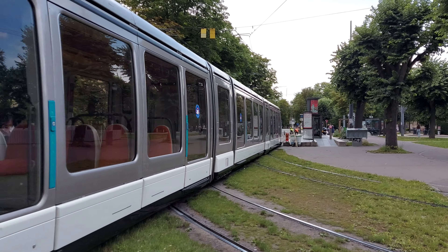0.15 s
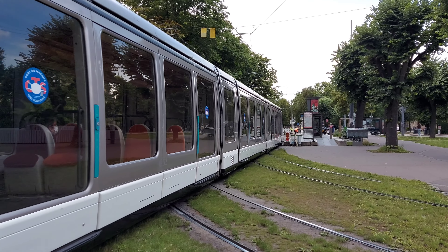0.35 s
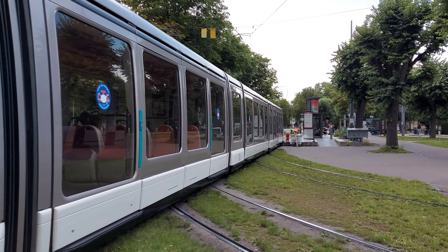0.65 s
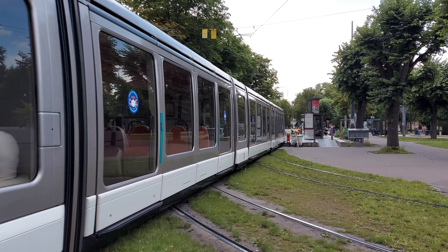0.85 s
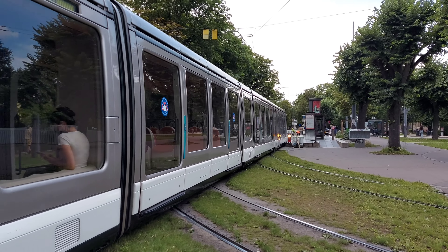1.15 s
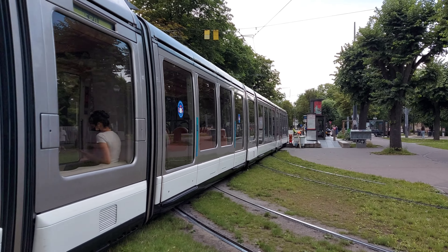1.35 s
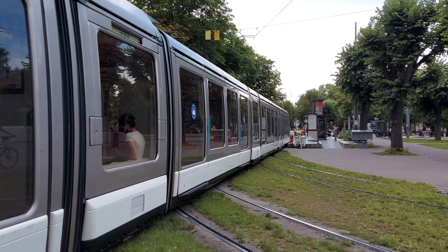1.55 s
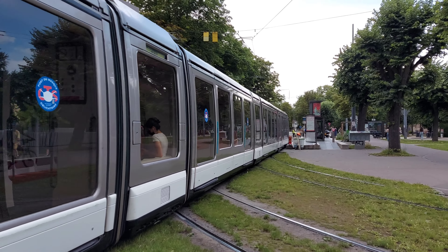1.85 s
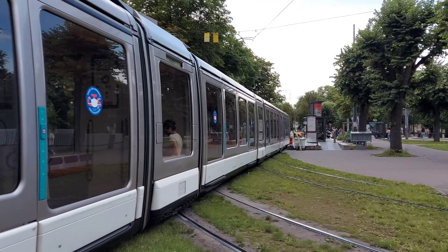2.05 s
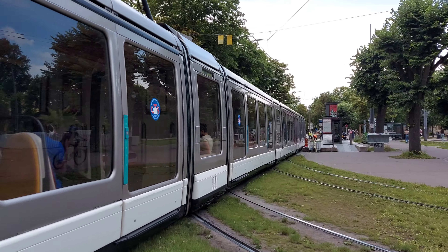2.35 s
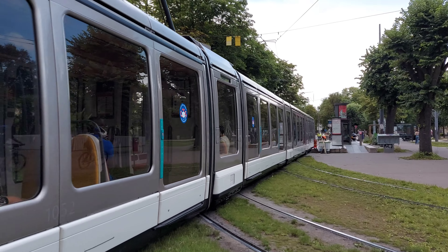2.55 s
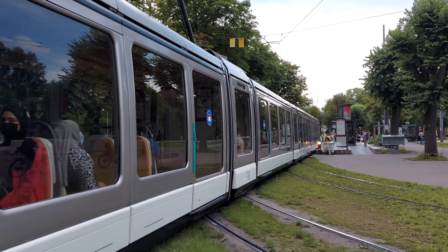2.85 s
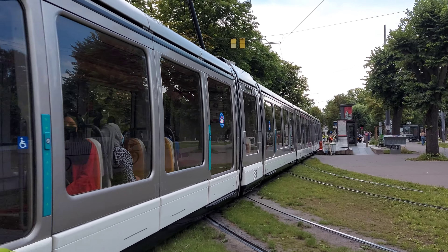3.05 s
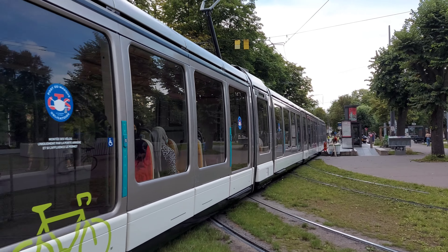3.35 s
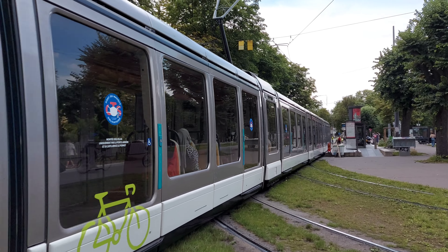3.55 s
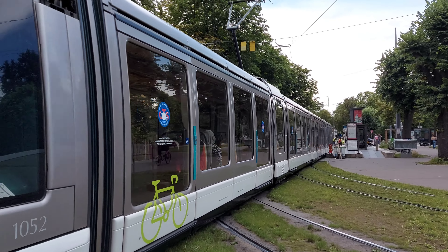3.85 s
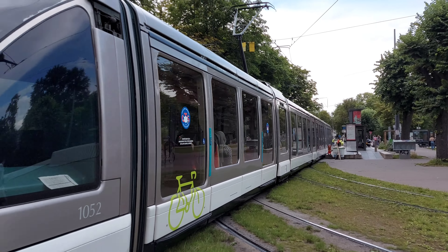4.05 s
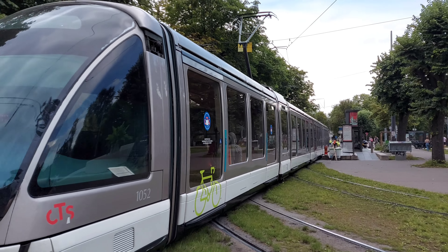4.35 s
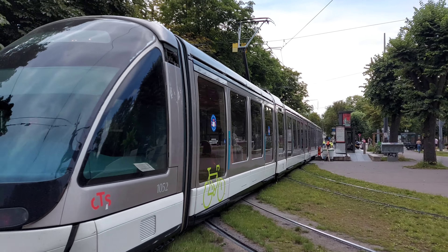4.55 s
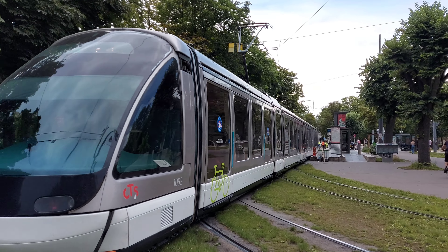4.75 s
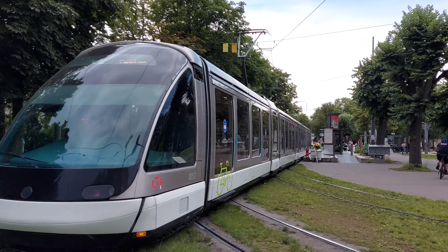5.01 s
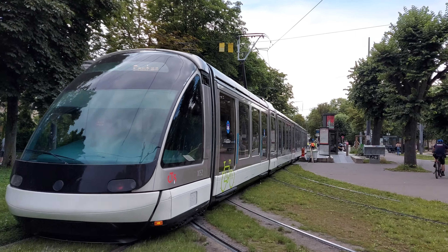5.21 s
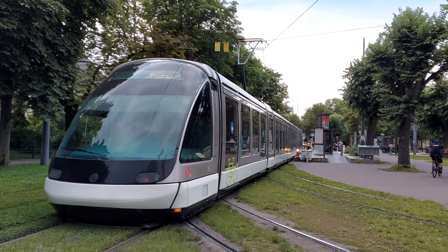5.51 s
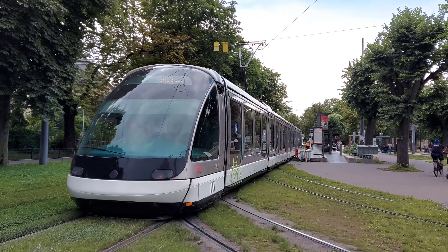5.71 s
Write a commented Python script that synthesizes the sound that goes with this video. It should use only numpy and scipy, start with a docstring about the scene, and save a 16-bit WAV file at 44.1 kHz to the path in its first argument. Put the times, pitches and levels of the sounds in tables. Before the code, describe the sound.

A tram passes slowly and close by outdoors, heard on a small stereo microphone with a dry, wide image. From 0 to 1 s a deep rumble and growl carry gritty flange scraping, a tight cluster of clattering rattles at 0.1-0.4 s, bass thuds and shrill steely ringing. From about 1.1 to 2 s the rolling softens and a thin, slightly sinking motor whine near 900 Hz shows faintly, with a heavier thud and knock at 1.7 s. At 2.2 s the growl jumps back; between 2.4 and 3.3 s comes the densest, brightest passage of rattles, pings, scraping and thuds, with a low boom swelling after 3.2 s. From 3.9 s it thins, with sparse clacks and short whines around 4.5 and 5.1 s. A thud at 4.9 s and another at 5.3 s lead into a last clatter, sharpest at 5.5 s, ringing on to the end. Faint leaf and traffic hiss lies behind.

```python
"""Slow tram over a track crossing

A low-floor tram rolls slowly past over a track crossing on grass-bedded rails, heard by a small two-port microphone.
Coloured noise makes the rumbling track bed, growling bogies, roaring rail and scraping flanges; decaying sines
make the thuds. Flange rattles drive resonators that ring like steel wheels, brief pings mix sine and hiss,
and gliding sines whine faintly as motors go by."""
import sys
import numpy as np
from scipy import signal
from scipy.fft import rfft, irfft, next_fast_len
from scipy.io import wavfile

SR = 44100
rng = np.random.default_rng(int(sys.argv[2]) if len(sys.argv) > 2 else 0)


def inscribe(sig):
    """Save sig as 16-bit PCM at rate SR to the path in sys.argv[1].

    A 1-D sig is mono; a 2-D sig holds one channel per row.
    Samples are clipped to [-1, 1] before scaling.
    """
    pcm = np.round(np.clip(np.atleast_2d(sig).T, -1, 1) * 32767)
    wavfile.write(sys.argv[1], SR, pcm.astype(np.int16))


N = 259175
FFT_SIZE = next_fast_len(N, True)

# Colour of the track bed. Each row: frequency in Hz, density in dB per Hz.
BED_COLOUR = [(15, -49), (25, -20), (63, -5), (81, 0), (96, 4), (130, -19), (160, -14), (210, -28),
              (350, -120)]
# Colour of flange scraping, borrowed for the far street. Each row: frequency in Hz, density in dB per Hz.
FLANGE_COLOUR = [(1000, 6), (1300, 4), (2000, -2.5), (3000, -2.5), (4000, 0), (4700, -2.5), (6500, -7),
                 (8600, -3.5), (9300, -6), (13000, -9), (14300, -12.5), (16200, -24)]
# Edges between the four parts of the contact spectrum, in Hz.
PART_EDGES_HZ = [3200, 4800, 7000]


def from_db(db):
    """Decibels to gain."""
    return 10 ** (np.asarray(db) / 20)


def rms_one(x):
    """Scale to unit rms."""
    return x / np.sqrt(np.mean(x ** 2) + 1e-20)


def in_time(rows):
    """Columns of a curve table, interpolated at every sample."""
    s, *columns = np.transpose(rows)
    return [np.interp(np.arange(N) / SR, s, column) for column in columns]


def at_hz(points, hz):
    """A spectrum table read on a log-frequency axis."""
    table_hz, values = np.transpose(points)
    return np.interp(np.log(hz), np.log(table_hz), values)


def bins_hz():
    """Frequencies of the transform bins, at least 1 Hz so that their logarithm exists."""
    return np.maximum(np.arange(FFT_SIZE // 2 + 1) * SR / FFT_SIZE, 1)


def to_time(bins):
    """Transform bins back to samples."""
    return irfft(bins, FFT_SIZE)[..., :N]


def drift(rate_hz):
    """Slow random wander of unit rms: low-passed noise made at every 40th sample, then interpolated."""
    step, settle = 40, 2000
    pole = np.exp(-2 * np.pi * rate_hz * step / SR)
    raw = rng.standard_normal(N // step + settle + 2)
    slow = signal.lfilter([1], [1, -2 * pole, pole * pole], raw)[settle:]
    return np.interp(np.arange(N) / step, np.arange(len(slow)), rms_one(slow))


def noise(spectrum):
    """Two unrelated noises (mid, side) of one colour, silent outside the table; joint rms 1."""
    hz = bins_hz()
    inside = (hz > spectrum[0][0]) & (hz < spectrum[-1][0])
    white = rfft(rng.standard_normal((2, FFT_SIZE)))
    return rms_one(to_time(white * from_db(at_hz(spectrum, hz)) * inside))


def resonance(x, hz, width_hz):
    """One mode as a two-pole filter with gain close to 1 at its peak."""
    r = np.exp(-np.pi * width_hz / SR)
    feed = np.array([1, 0, -1]) * (1 - r * r) / 2
    return signal.lfilter(feed, [1, -2 * r * np.cos(2 * np.pi * hz / SR), r * r], x)


def double_resonance(x, hz, width_hz):
    """The same mode twice in a row, for steeper skirts and a softer onset."""
    return resonance(resonance(x, hz, width_hz), hz, width_hz)


def spell(start_s, end_s, db, rise_db_per_s, fall_db_per_s):
    """Level in dB that rises to a plateau and falls away after it."""
    t = np.arange(N) / SR
    return db - rise_db_per_s * np.maximum(start_s - t, 0) - fall_db_per_s * np.maximum(t - end_s, 0)


def loudest_spell(rows, rise_db_per_s, fall_db_per_s):
    """The highest of several spells at every moment, in dB."""
    return np.max([spell(*row, rise_db_per_s, fall_db_per_s) for row in rows], axis=0)


def track_bed(bed_db):
    """Rolling weight shakes the ground under the rails: a deep noise rumble that follows its level curve."""
    return from_db(bed_db) * noise(BED_COLOUR)


def low_boom():
    """Bed noise through two sharp resonances becomes a narrow boom near 55 Hz that swells."""
    # Swells of the boom. Each row: start in seconds, end in seconds, level in dB.
    boom_swells = [(.5, .95, -36), (1.15, 1.8, -40), (3.2, 3.95, -30.5)]
    floor_db, edge_db_per_s = -38.5, 57
    boom_db = np.maximum(loudest_spell(boom_swells, edge_db_per_s, edge_db_per_s), floor_db)
    narrow = resonance(resonance(noise(BED_COLOUR), 52.46, 3.1), 55.36, 0.9)
    return from_db(boom_db) * rms_one(narrow)


def bogie_frame(load_db, bumps):
    """Rough rolling shakes the bogie frame: a growl whose modes surge by turns."""
    # Colour of the growl. Each row: frequency in Hz, density in dB per Hz.
    frame_colour = [(71, -23), (120, 2.5), (145, 1.5), (189, -2.5), (220, -2), (292, 0.5), (466, -14),
                    (589, -48), (650, -21), (840, -59), (1430, -120)]
    # Modes of the frame. Each row: frequency in Hz, width of each of two passes in Hz, relative level in dB.
    frame_modes = [(186.7, 24, -3), (286.2, 49, -3.5), (360.6, 80, -6.5), (451, 29, -10.5)]
    modes_db, surge_db, surge_rate_hz = -13.0, 3, 9
    shaken = noise(frame_colour)
    growl = shaken
    for hz, width_hz, db in frame_modes:
        gain = from_db(db + modes_db + surge_db * drift(surge_rate_hz))
        growl = growl + gain * rms_one(double_resonance(shaken, hz, width_hz))
    return from_db(load_db + 1.17 * bumps) * rms_one(growl)


def rail_roar(contact, bumps):
    """Rough rail under rolling wheels roars; it also takes up the low part of grinding and rattles."""
    # Colour of the rail. Each row: frequency in Hz, density in dB per Hz.
    rail_colour = [(290, 7.5), (500, -1), (595, -7), (764, 0), (909, 0), (1200, -9), (1290, -18.5),
                   (1900, -13), (2470, -20.5), (4180, -120)]
    # Roar from rolling. Each row: time in seconds, level in dB.
    roar_curve = [(0.0, -47), (0.16, -31.5), (1.49, -40), (3.2, -29.5), (4.92, -40), (5.87, -34)]
    rattle_db = 2.5
    rolling = from_db(in_time(roar_curve)[0] + 1.5 * bumps + 1.5 * drift(45))
    rattled = from_db(rattle_db) * contact[0]
    return np.hypot(rolling, rattled) * noise(rail_colour)


def running_gear(load_db, bed_db, contact):
    """Bed, boom, bogie frame and rail together; the same bumps move frame and rail."""
    bumps = drift(14)
    return track_bed(bed_db) + low_boom() + bogie_frame(load_db, bumps) + rail_roar(contact, bumps)


def flange_contact(grind_db):
    """Contact strength in four parts of the spectrum: steady grinding plus rattles that start sharply and die away."""
    # Grinding turns shrill near 4 kHz. Each row: start in seconds, end in seconds, extra level in dB.
    squeals = [(0, .5, 0), (2.4, 3.153, -2)]
    # Rattles as flanges strike the crossing. Each row: start in seconds, level in dB before a common trim,
    # brightness in dB (tilts lowest part against highest), clang near 4 kHz in dB before a common lift,
    # 60 dB decay in seconds.
    rattles = [(0.025, -33.5, -16.5, 10, 0.92), (0.108, -17, -1.5, -3.5, 0.71), (0.145, -18, 2, 1, .3),
               (0.1774, -23.5, -9, 0, 0.23), (0.3214, -31.5, 11, -13, 0.74), (0.35, -11.5, -3, 2, 0.084),
               (0.366, -20, -5, -2, 0.4), (0.3904, -17.5, -1, 0, 0.28), (0.772, -19.5, -1, -3.5, 0.54),
               (0.8144, -34, 13, 6, 0.2), (0.991, -18.5, 2, -10, 0.18), (1.089, -22.5, 1.5, -14, 0.81),
               (1.202, -16.5, 7, -10, 0.046), (1.4292, -22, -1, -33, 0.17), (1.6332, -23, 2, -9, 0.059),
               (1.721, -22, -2.5, -3.5, 0.75), (1.7733, -15.5, 0.5, 0.5, 0.16), (1.874, -25, -2, -3, 0.1),
               (2.0715, -20.5, -1, -5.5, 0.57), (2.2243, -24.5, -4, 1, 0.28), (2.309, -20, 2, 2, 0.22),
               (2.3484, -30, 6, 12, 0.13), (2.417, -14.5, 2.5, 3, 0.19), (2.516, -15, 1, 2, 0.11),
               (2.617, -26.5, -8, 7.5, 0.12), (2.658, -21.5, 2.5, -2, 1), (2.6955, -17, 3.5, 6, 0.096),
               (2.7414, -17.5, 0, -7, 0.93), (2.77, -11, 0, -2.5, 0.28), (2.838, -16.5, 3, 13, 0.029),
               (2.87, -8.5, 2.5, -3, 0.074), (2.9307, -21, 2, -14, 0.37), (3.069, -32, -17, 3, 0.064),
               (3.165, -20, 1, -19, 0.66), (3.2246, -10, -0.5, -12, 0.28), (3.304, -21.5, 7, -0.5, 0.45),
               (3.4416, -23, -1, -0.5, 0.18), (3.488, -17.5, 1.5, -9, 0.61), (3.6844, -20, 5.5, -6, 0.18),
               (3.8874, -19, 2, -9, 0.6), (4.1185, -21, -2.5, -10, 0.3), (4.5694, -27.5, -0.5, -11, 0.76),
               (4.89, -22.5, -1, -9, 0.11), (4.95, -27, -4, -12, 0.72), (5.203, -28.5, -2, -4, 0.21),
               (5.262, -22, -0.8, -13, 1), (5.347, -19, 2.5, -7.5, 0.9), (5.375, -35, -2, -8, .3),
               (5.431, -25, -5, -18, 0.18), (5.525, -11, -2.5, -9, 0.11), (5.6286, -22.5, -5, 1.5, 0.12),
               (5.738, -22.5, -1.5, -14, 0.49), (5.768, -23, 3, -2, 0.42)]
    attack_s, low_lag_s = 0.0022, 0.0024
    rattle_trim_db, clang_lift_db, least_shrill_db = -16.0, 5.5, -3.4
    squeal_edge_db_per_s = 10
    power = np.tile(from_db(grind_db + 1.4 * drift(16)) ** 2, (4, 1))
    shrill_db = loudest_spell(squeals, squeal_edge_db_per_s, squeal_edge_db_per_s)
    power[1] *= from_db(np.maximum(shrill_db, least_shrill_db)) ** 2
    for s, db, bright_db, clang_db, t60_s in rattles:
        at = round(s * SR)
        t = np.arange(min(N - at, SR // 2)) / SR
        shape = from_db(db + rattle_trim_db - 60 * t / t60_s) * (1 - np.exp(-t / attack_s))
        part_gains = from_db([[-bright_db], [clang_db + clang_lift_db], [0], [bright_db]])
        power[:, at:at + len(t)] += (shape * part_gains) ** 2
    # the lowest part builds up later
    lag = np.exp(-1 / (low_lag_s * SR))
    power[0] = signal.lfilter([1 - lag], [1, -lag], power[0], zi=[lag * power[0, 0]])[0]
    return np.sqrt(power)


def flanges(contact):
    """Gritty broadband scrape, split into four parts so that each rattle has its own colour."""
    grit = drift(32)      # grains of rust and sand
    scrape, hz = rfft(noise(FLANGE_COLOUR), FFT_SIZE), bins_hz()
    below = [0] + [1 / (1 + (hz / edge) ** 8) for edge in PART_EDGES_HZ] + [1]
    out = 0
    for strength, down, up in zip(contact, below, below[1:]):
        part = to_time(scrape * (up - down))
        out = out + strength * from_db(1.8 * grit + 1.6 * drift(35)) * part
    return out


def street():
    """Far traffic and leaves: a faint steady noise with the flange colour."""
    return from_db(-53.5) * noise(FLANGE_COLOUR)


def wheels(contact):
    """The flange contact drives the modes of three sets of wheels; each mode takes up force by turns, its
    flicker the same in both ports."""
    # Modes of three sets of wheels, A, B and C; C rings briefly between the others and again at the end.
    # Each row: frequency in Hz, width in Hz before widening, relative level in dB.
    modes_a = [(1650, 140, 0), (1880, 130, 2), (2545, 120, 0), (3270, 80, -10), (4070, 100, -3),
               (4450, 120, -4), (5580, 120, -6), (6400, 110, -7), (7880, 80, 1), (8740, 90, -1),
               (9980, 160, -7), (11900, 130, -11), (13450, 180, -8)]
    modes_b = [(1200, 110, 3), (1620, 160, 3), (2160, 140, -5), (3040, 130, -9), (3980, 150, -3),
               (4210, 130, 2), (5960, 80, -6), (6500, 110, -4), (8255, 130, 1), (10210, 90, 1),
               (12100, 90, -9), (13670, 100, -3), (15550, 70, -13)]
    modes_c = [(2560, 110, -2), (4230, 90, -6), (5740, 80, -7), (6500, 90, -3), (8230, 120, 0),
               (10210, 90, -2), (13650, 90, -4)]
    # When sets A, B and C ring, one list each.
    # Each row: start in seconds, end in seconds, relative level in dB.
    wheel_spells = [
        [(0, 1.18, 7)],
        [(2.2, 3.86, 4)],
        [(1.72, 1.9, 5), (4.9, 5.88, 6.5)],
    ]
    rise_db_per_s, fall_db_per_s = 20.5, 15
    ring_db, flicker_db, widen = 6.0, 2.5, 1.45
    likeness = 0.95      # a near source: ports partly alike
    shared, own = rng.standard_normal((2, N))
    pair = np.array([shared, likeness * shared + np.sqrt(1 - likeness ** 2) * own])
    out = 0
    for modes, near in zip((modes_a, modes_b, modes_c), wheel_spells):
        near_db = loudest_spell(near, rise_db_per_s, fall_db_per_s)
        for hz, width_hz, db in modes:
            strength = contact[np.searchsorted(PART_EDGES_HZ, hz)]
            force = strength * from_db(near_db + flicker_db * drift(17.0))
            out = out + from_db(db + ring_db) * double_resonance(pair * force, hz, width_hz * widen)
    return out


def pings():
    """Brief rough tones: a sine wavering in pitch and a narrow hiss swell, flutter, hold and ring out."""
    # Brief pings near wheel pitches, and a few lower knocks.
    # Each row: start in seconds, pitch in Hz, nominal peak in dB, hold in seconds.
    ping_rows = [(0.027, 2660, -29, 0.0079), (0.035, 4130, -38.5, 0.014), (.19, 4430, -31, 0.01),
                 (0.385, 2520, -26, 0.011), (0.425, 4060, -32, 0.023), (0.454, 2530, -42, 0.028),
                 (0.677, 8900, -43, .012), (0.798, 2570, -32, 0.011), (0.028, 1410, -32, 0.015),
                 (1.712, 680, -35, .025), (1.768, 916, -28, 0.016), (2.623, 4100, -39, 0.0087),
                 (2.674, 4220, -34.5, 0.037), (2.76, 4130, -43.5, .36), (2.93, 3960, -45, 0.156),
                 (2.837, 4210, -30, 0.0053), (2.892, 4200, -50, 0.027), (3.069, 4070, -31, 0.0065),
                 (3.215, 4200, -37, 0.013), (3.165, 1600, -31, 0.035), (5.372, 4250, -38, 0.0089),
                 (5.429, 5690, -32.5, 0.007), (5.43, 13800, -40, .016), (5.435, 10200, -38, 0.013),
                 (5.44, 8230, -52, 0.013), (5.522, 2600, -37, 0.011), (5.792, 6500, -40, 0.018)]
    rise_s, t60_s, flutter_db = 0.0018, 0.044, 3.0
    waver_share, hiss_width_share = .007, .035      # shares of the pitch
    hiss_gain = .65
    out, t = np.zeros(N + SR), np.arange(SR * 3 // 4) / SR
    waver_s = np.pad(np.cumsum(waver_share * drift(65.5)) / SR, (0, SR), "edge")
    for s, hz, db, held_s in ping_rows:
        at = slice(round(s * SR), round(s * SR) + len(t))
        shape = (1 - np.exp(-t / rise_s)) * from_db(db - 60 * np.maximum(t - held_s, 0) / t60_s)
        width_hz = hiss_width_share * hz
        rough = resonance(rng.standard_normal(len(t)), hz, width_hz)
        hiss = rms_one(resonance(rough, hz, 2 * width_hz)) / np.sqrt(2)      # rms of a sine
        tone = np.sin(2 * np.pi * hz * (t + waver_s[at]) + np.pi * rng.standard_normal())
        out[at] += shape * (np.sqrt(1 - hiss_gain ** 2) * tone + hiss_gain * hiss)
    return out[:N] * from_db(flutter_db * drift(70))


def thuds():
    """A wheel's weight lands over a few milliseconds and the bed swings as a decaying sine."""
    # Wheels dropping over rail gaps. Each row: start in seconds, level in dB before a common trim, pitch in Hz.
    drops = [(0.069, -13, 94), (0.376, -11, 87), (0.809, -15.5, 93), (1.703, -10.5, 74.7),
             (2.143, -14, 79.6), (2.688, -8, 78.6), (2.928, -16, 88.3), (3.042, -17, 115),
             (3.142, -11.5, 83.4), (3.345, -28, 90), (3.464, -12, 103), (3.608, -10, 95),
             (3.799, -19, 84.4), (4.872, -13.5, 76.4), (5.338, -18, 72)]
    land_s, hold_s, t60_s, trim_db = .006, 0.029, 0.2, -3.5
    out = np.zeros(N)
    for s, db, hz in drops:
        at = round(s * SR)
        t = np.arange(min(N - at, SR // 2)) / SR
        decay = from_db(db + trim_db - 60 * np.maximum(t - hold_s, 0) / t60_s)
        out[at:at + len(t)] += decay * (1 - np.exp(-t / land_s)) * np.sin(2 * np.pi * hz * t)
    return out


def motor():
    """A thin traction whine: a sine whose pitch sinks as each motor goes by."""
    # Motors going by. Each row: start in seconds, end in seconds, pitch at the start in Hz,
    # rms level at the start in dB, rms level at the end in dB.
    motor_passes = [(1.12, 2.05, 902, -43.5, -42.5), (4.42, 4.72, 881, -38, -45),
                    (5.0, 5.31, 871, -53, -43)]
    sag_hz_per_s, edge_db_per_s = 13.5, 70
    out, t = 0, np.arange(N) / SR
    for start_s, end_s, start_hz, start_db, end_db in motor_passes:
        hz = start_hz - sag_hz_per_s * (t - start_s) + .4 * drift(3)
        plateau_db = np.interp(t, [start_s, end_s], [start_db, end_db])
        db = spell(start_s, end_s, plateau_db, edge_db_per_s, edge_db_per_s) + .8 * drift(3)
        out = out + np.sqrt(2) * from_db(db) * np.sin(2 * np.pi * np.cumsum(hz) / SR)
    return out


def scene():
    """Diffuse sources as mid and side spread over the two ports; wheels and pings are added directly."""
    # Rolling levels. Each row: time in seconds, bogie frame in dB, flange grinding in dB, track bed in dB.
    rolling_curve = [(0.0, -20, -35.5, -22), (0.03, -26.5, -42, -17.5), (0.1, -22.5, -39, -22.5),
                     (0.44, -25, -38.5, -24), (1.31, -30, -46.5, -28.5), (1.47, -30.5, -48, -31.5),
                     (2.13, -32, -59.5, -33.5), (2.23, -20, -36.5, -43), (2.29, -26, -39.5, -22),
                     (2.7, -24.5, -44.5, -31), (2.86, -24, -36.5, -23), (3.42, -23.5, -38, -25),
                     (4.14, -27.5, -42.5, -30), (4.71, -32.5, -51, -34), (4.86, -36, -59.5, -36),
                     (4.94, -26.5, -45, -30.5), (5.12, -36, -51.5, -38), (5.34, -25.5, -66, -34.5),
                     (5.45, -26, -40, -30.5), (5.88, -28.5, -45.5, -31)]
    # How alike the two ports hear diffuse sound. Each row: frequency in Hz, left-right likeness from 0 to 1.
    port_likeness = [(30, 0.86), (80, 1), (150, 0.95), (300, 0.99), (430, 0.95), (600, 0.31), (800, 0.81),
                     (1000, 0.74), (1300, 0.067), (2000, 0.061), (4000, 0.069), (6000, 0.07),
                     (15000, 0.016)]
    load_db, grind_db, bed_db = in_time(rolling_curve)
    contact = flange_contact(grind_db)
    sound = running_gear(load_db, bed_db, contact) + flanges(contact) + street()
    sound[0] += thuds() + motor()
    mid, side = rfft(sound, FFT_SIZE)
    alike = at_hz(port_likeness, bins_hz())      # long waves reach both ports alike
    left_right = np.array([[1], [-1]])
    spread = to_time(np.sqrt(1 + alike) * mid + np.sqrt(1 - alike) * side * left_right)
    return spread + wheels(contact) + pings()


def record(dry):
    """The housing shades and shifts each port differently; deep bass and the top are cut."""
    # Shading by the housing. Each row: frequency in Hz, left minus right in dB.
    port_shading = [(60, -0.5), (400, .5), (520, -0.5), (750, 3.5), (1150, -1), (1600, 3), (2100, 0),
                    (2500, 1), (3100, -3), (4500, -6.5), (6000, -15), (8200, -11.5), (9200, 3),
                    (12000, -6.5), (15000, -4)]
    # Phase between the ports. Each row: frequency in Hz, lead of the left port in radians.
    port_phase = [(60, -0.63), (600, 0.6), (1030, 0.36), (1720, 1.16), (2580, 0.3), (3270, 1.7),
                  (4050, 0.2), (5940, 1), (7920, 2.5), (9560, 0.7), (15000, 2.1)]
    half_each = np.array([[1], [-1]]) / 2
    shade_db = at_hz(port_shading, bins_hz()) * half_each
    lead = at_hz(port_phase, bins_hz()) * half_each
    shaded = to_time(rfft(dry, FFT_SIZE) * from_db(shade_db) * np.exp(1j * lead))
    bass_cut = signal.butter(3, 42.0, "high", fs=SR, output="sos")
    top_cut = signal.ellip(10, .5, 75, 15500, fs=SR, output="sos")
    return signal.sosfilt(top_cut, signal.sosfilt(bass_cut, shaded))


dry = scene()
out = record(dry)
inscribe(out)
```